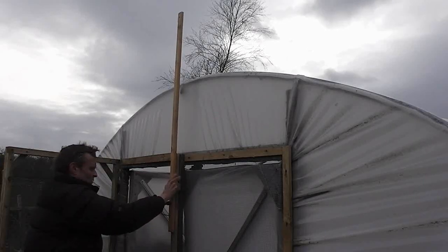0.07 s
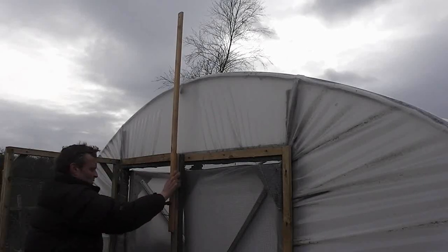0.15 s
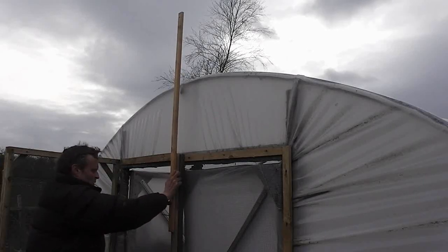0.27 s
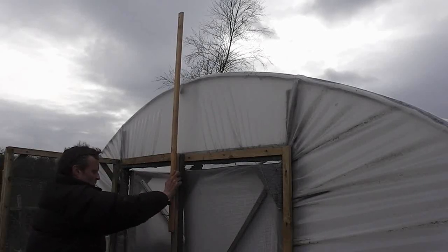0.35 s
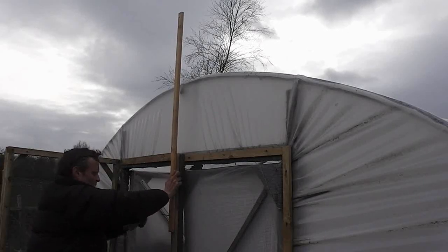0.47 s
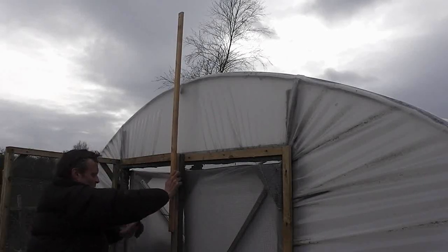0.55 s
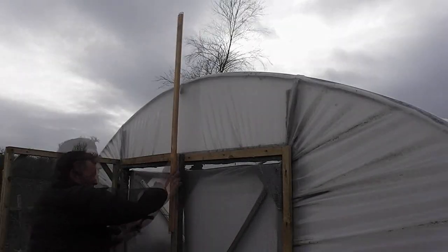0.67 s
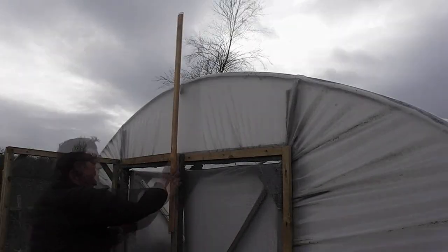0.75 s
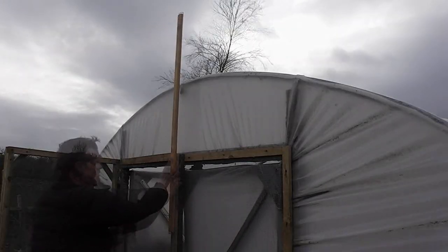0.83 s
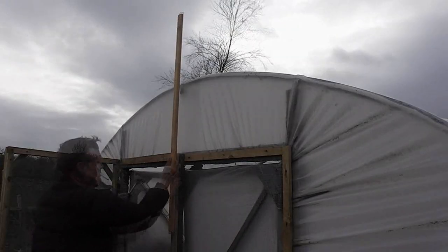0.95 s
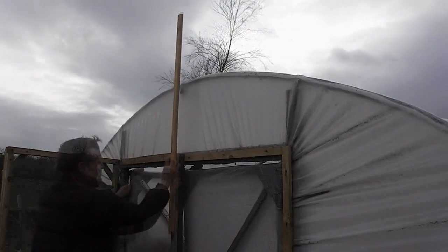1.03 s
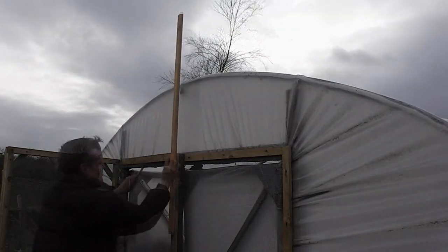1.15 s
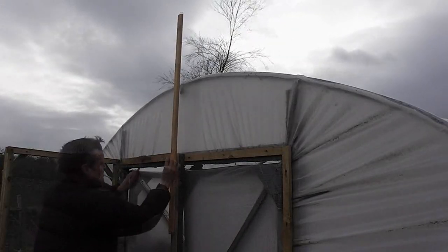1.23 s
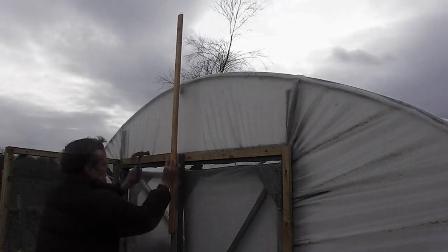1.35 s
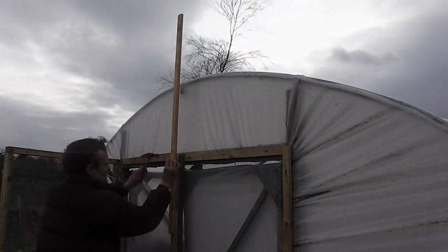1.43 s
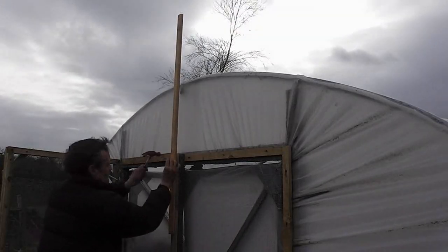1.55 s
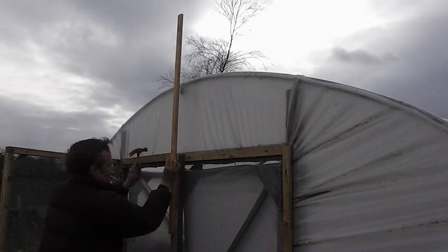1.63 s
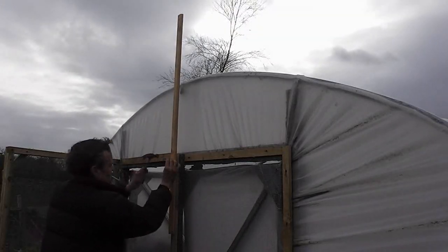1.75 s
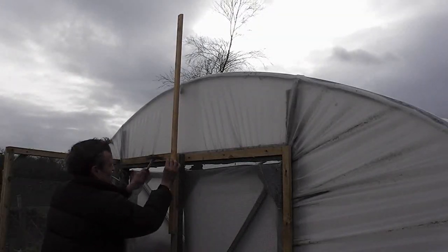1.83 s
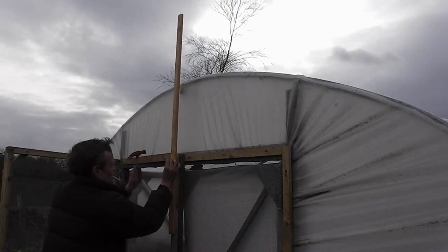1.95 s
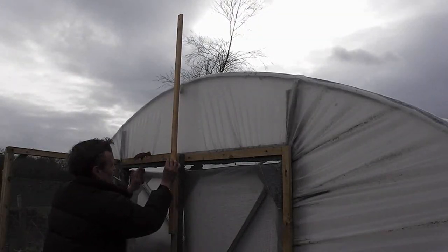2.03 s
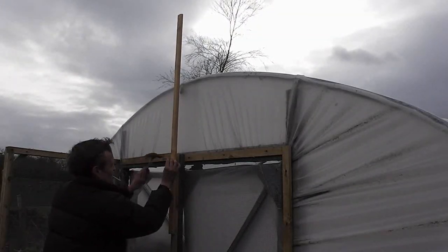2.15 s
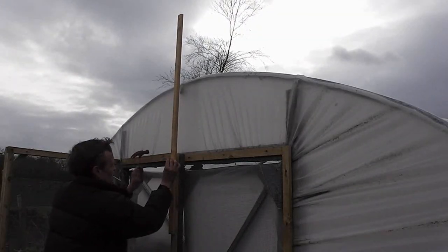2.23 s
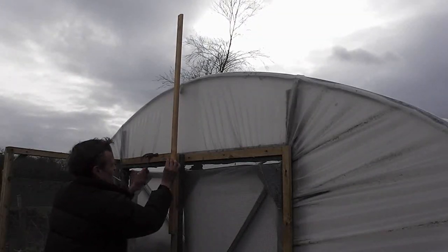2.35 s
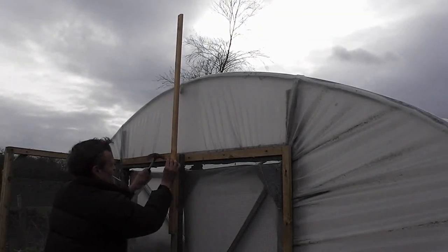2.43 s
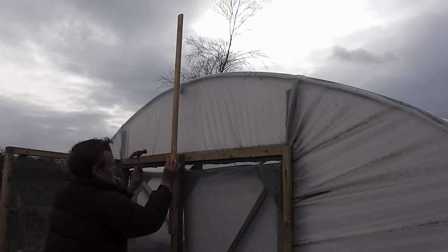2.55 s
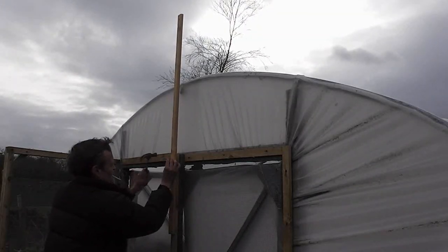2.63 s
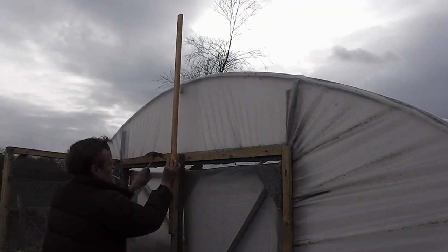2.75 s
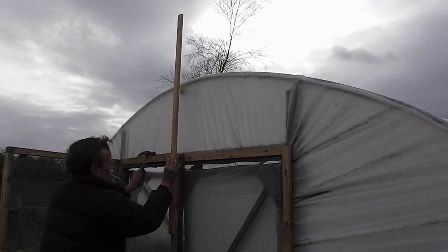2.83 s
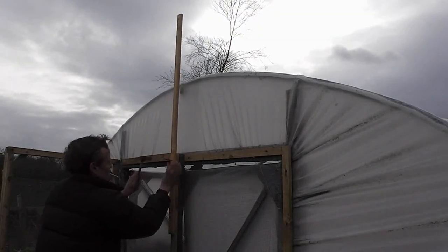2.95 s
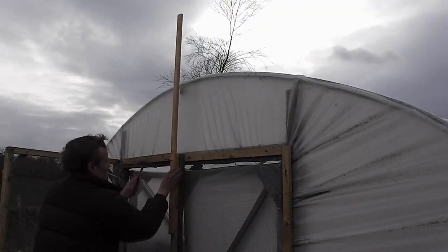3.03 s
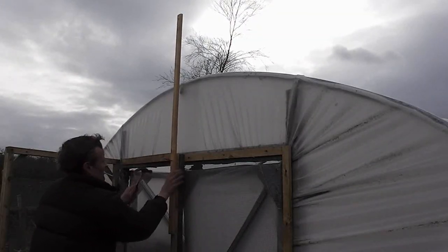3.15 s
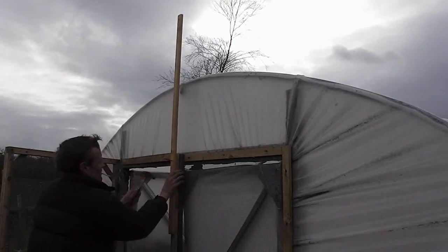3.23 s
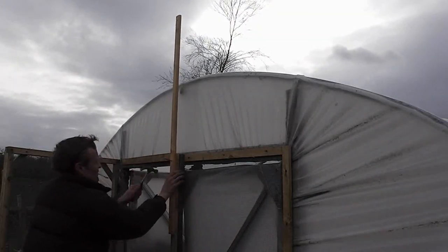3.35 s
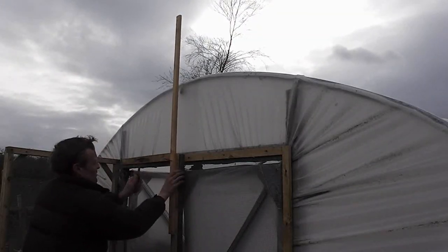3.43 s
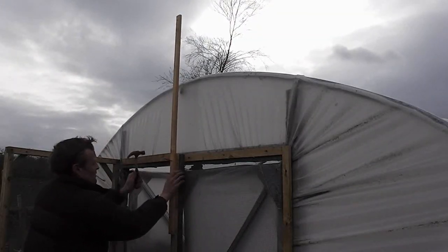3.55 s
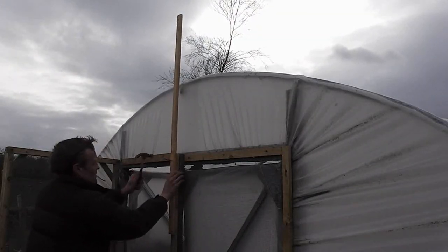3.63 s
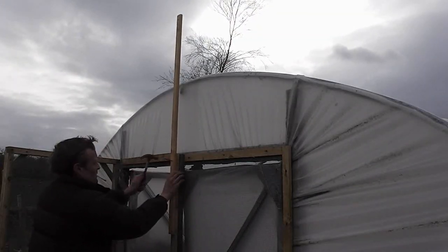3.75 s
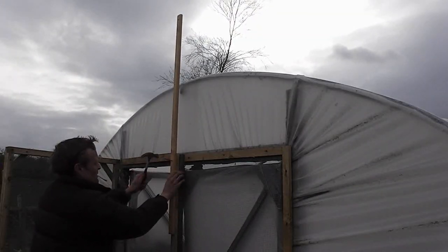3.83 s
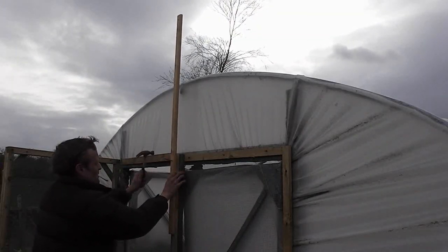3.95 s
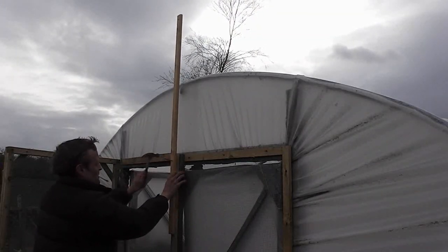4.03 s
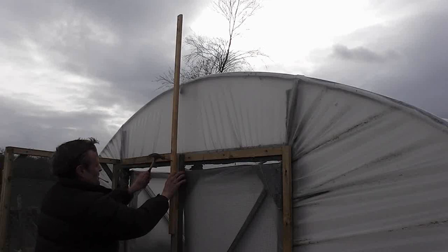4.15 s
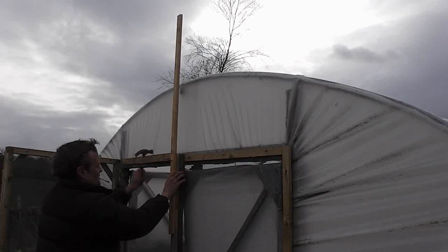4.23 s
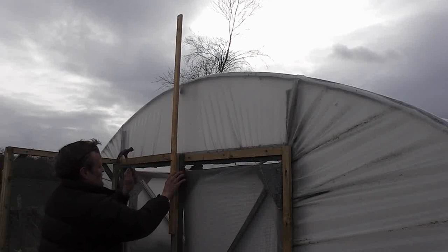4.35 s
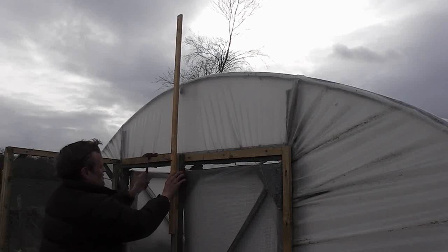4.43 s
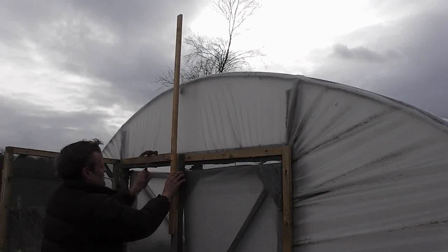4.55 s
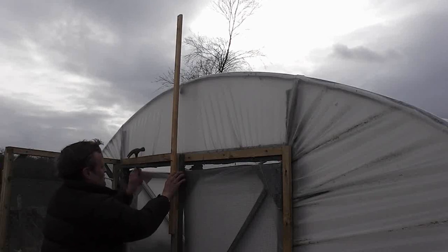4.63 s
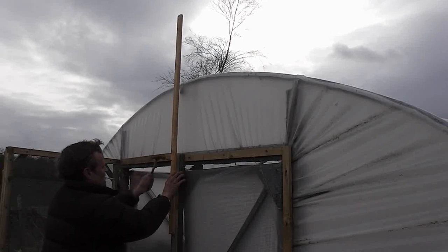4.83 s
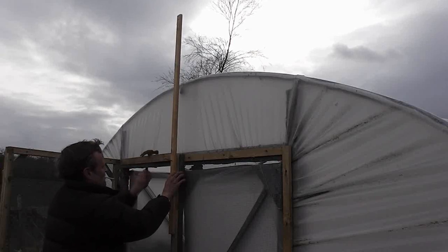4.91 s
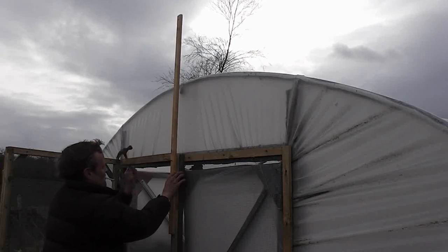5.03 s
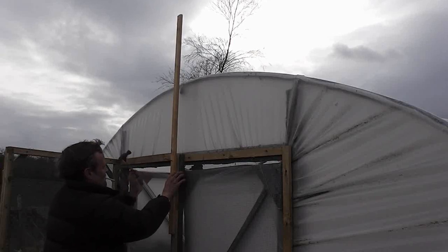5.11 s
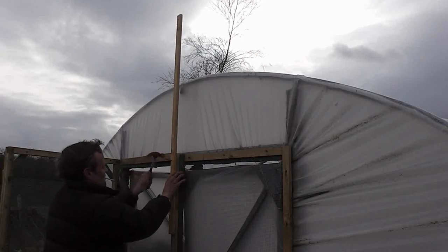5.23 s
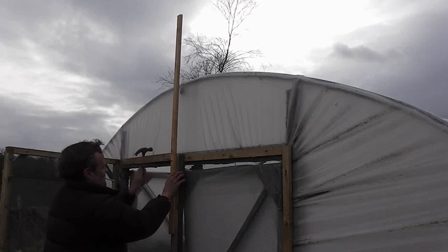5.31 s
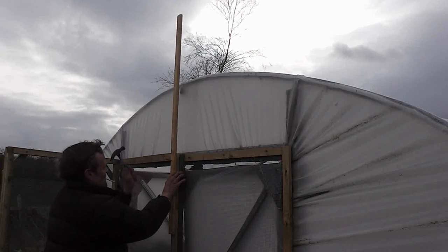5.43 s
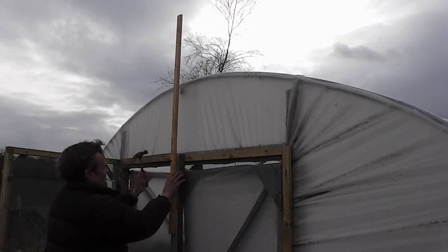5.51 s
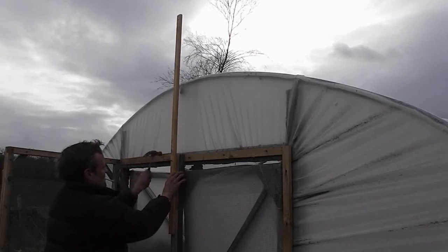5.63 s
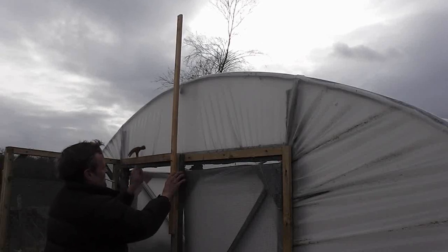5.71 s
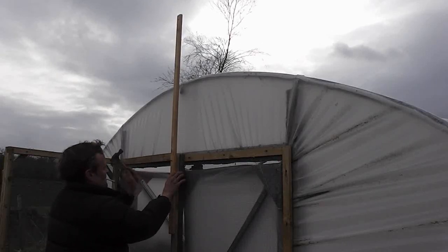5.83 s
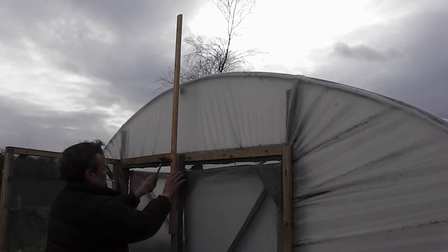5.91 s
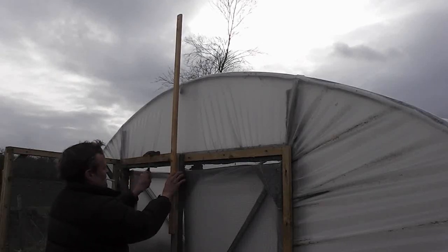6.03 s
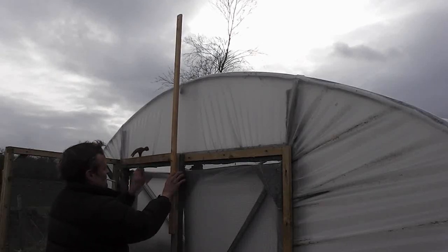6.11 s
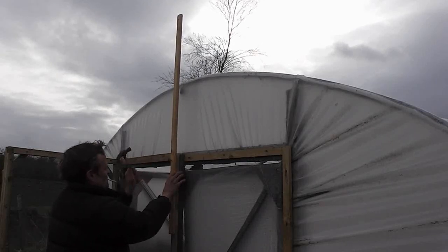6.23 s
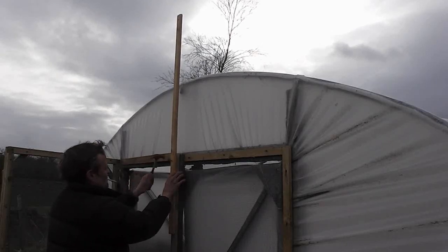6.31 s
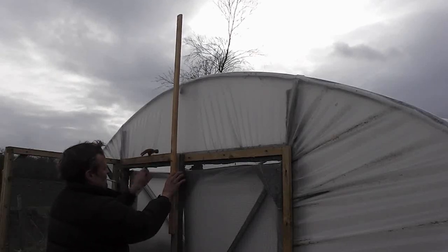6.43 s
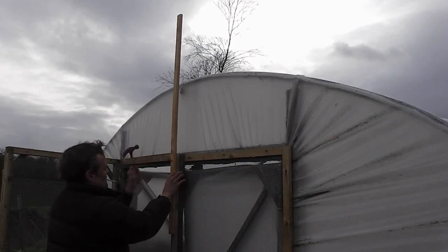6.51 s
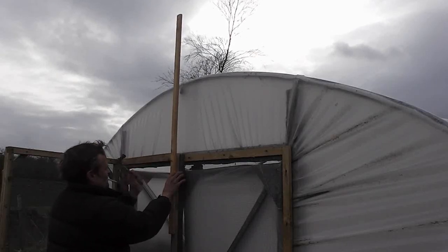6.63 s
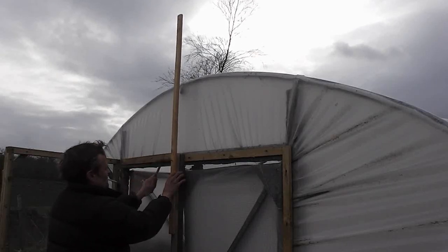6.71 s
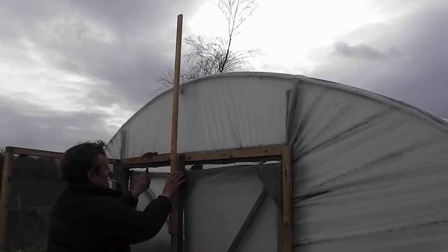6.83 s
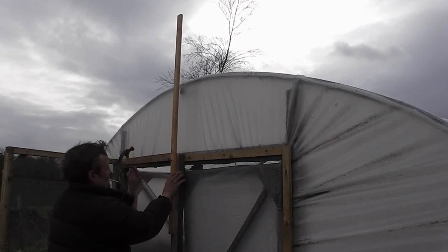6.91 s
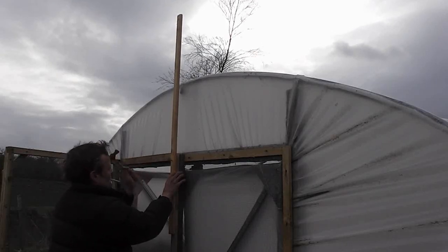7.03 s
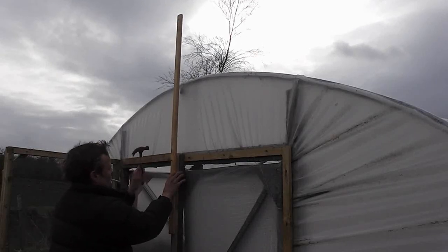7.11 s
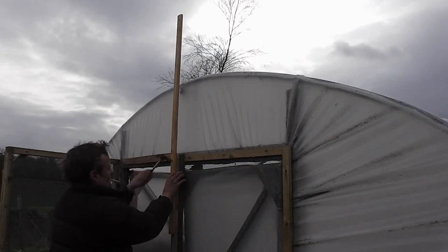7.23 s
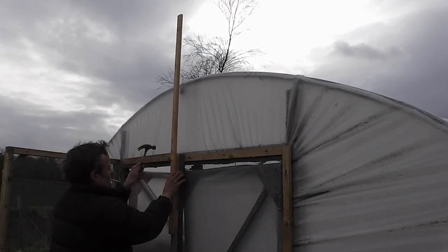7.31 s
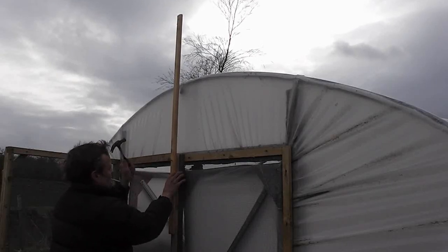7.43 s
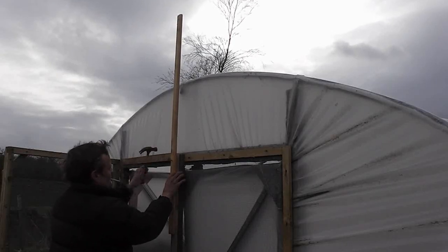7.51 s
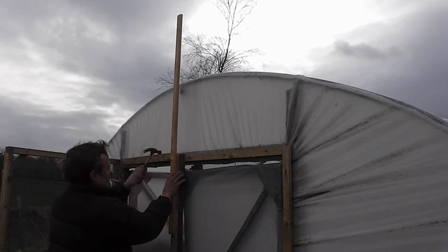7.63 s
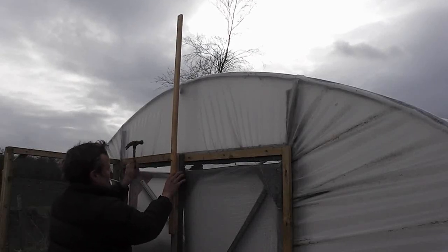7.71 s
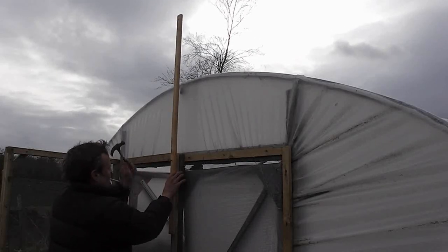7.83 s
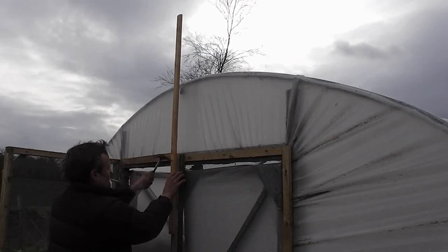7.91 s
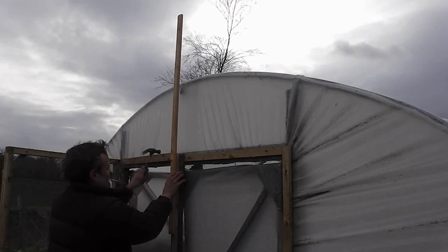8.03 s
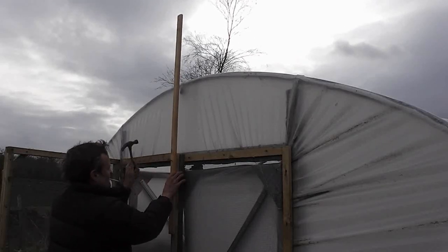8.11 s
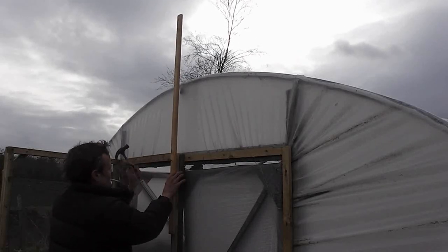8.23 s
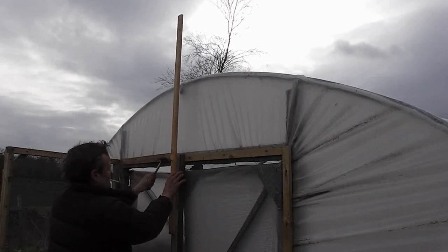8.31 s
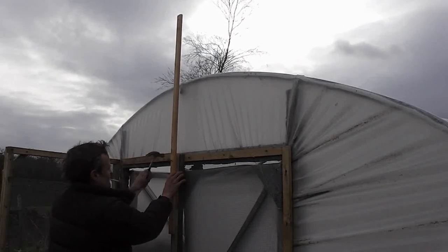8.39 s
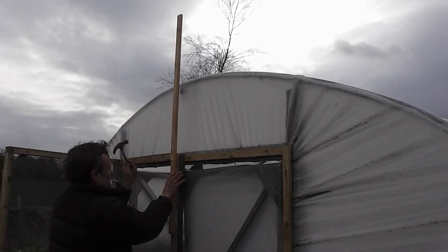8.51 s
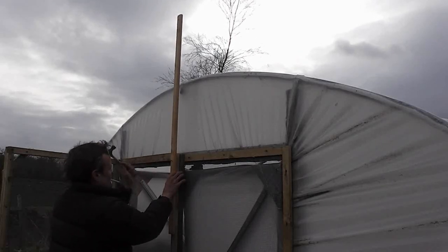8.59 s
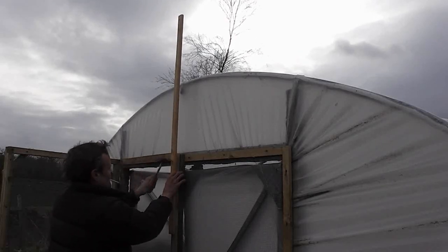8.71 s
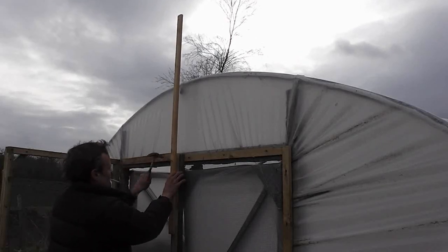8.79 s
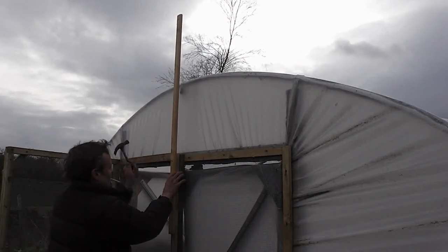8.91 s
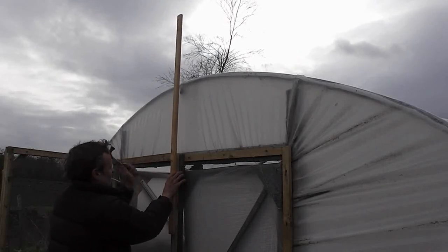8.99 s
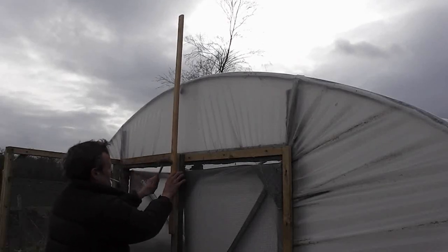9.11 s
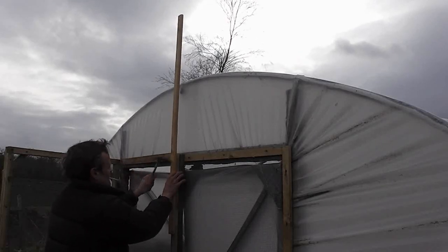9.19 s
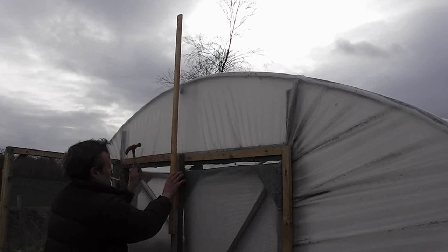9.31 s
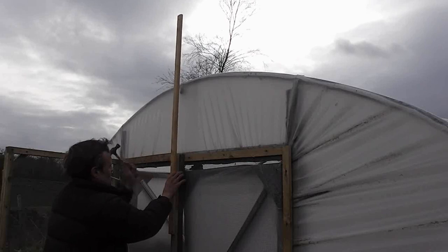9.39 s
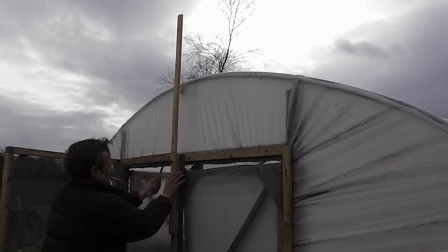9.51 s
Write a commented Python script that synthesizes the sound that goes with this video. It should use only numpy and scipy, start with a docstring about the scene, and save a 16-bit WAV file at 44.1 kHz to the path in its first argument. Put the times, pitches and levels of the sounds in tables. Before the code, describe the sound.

A claw hammer drives a nail into timber outdoors, a few quick strikes, a pause, then steady sharp blows over wind and traffic.

```python
"""Hammering on a greenhouse door frame

A claw hammer drives a nail through a post into the timber door frame of a plastic-covered greenhouse.
Timber and steel ring as decaying modes; tick, frame, sheeting and yard are shaped noise; a far wall sends one echo.
Traffic is a coloured noise drone over a low hum of swelling sines. A jacket rustles and scratches as bright noise;
short low noise bursts are knocks on housing and frame and low echoes of two blows.
Low noise, mostly opposed left to right, is wind at two mic ports."""
import sys
import numpy as np
from scipy import signal
from scipy.io import wavfile
from scipy.ndimage import uniform_filter1d

SR = 44100
rng = np.random.default_rng(int(sys.argv[2]) if len(sys.argv) > 2 else 0)


def bounce(signal):
    """Save signal as a 16-bit WAV file at the path given by the first command-line argument."""
    frames = np.transpose(np.atleast_2d(signal))
    limited = np.clip(frames, -1, 1)
    pcm = np.round(limited * 32767).astype(np.int16)
    wavfile.write(sys.argv[1], SR, pcm)


N = 421155  # samples


def gain_of(db):
    """Decibels to amplitude."""
    return 10 ** (np.asarray(db) / 20)


def evened(x):
    """Scales to an rms of one."""
    return x / np.sqrt(np.mean(x ** 2) + 1e-20)


def read(points, hz, axis=1):
    """One column of a table over a logarithmic frequency axis."""
    table = np.array(points, float)
    return np.interp(np.log(hz + 1), np.log(table[:, 0] + 1), table[:, axis])


def along(curve, axis=1):
    """One column of a time curve at every sample."""
    table = np.array(curve, float)
    return np.interp(np.arange(N) / SR, table[:, 0], table[:, axis])


def add(mix, start_s, sound):
    """Mixes a two-channel sound in at a time."""
    part = mix[:, round(start_s * SR):][:, :sound.shape[1]]
    part += sound[:, :part.shape[1]]


def panned(x, pan_db):
    """Leans a sound left (positive) or right, giving two channels."""
    return x * gain_of([[pan_db / 2], [-pan_db / 2]])


def filtered(x, band_hz, kind):
    """Second-order Butterworth filter along time."""
    return signal.sosfilt(signal.butter(2, band_hz, kind, fs=SR, output="sos"), x, axis=-1)


def hiss(spectrum, likeness, size, patchy_db):
    """Two channels of coloured noise with a given left-right likeness and drifting patches, at an rms of one."""
    hz = np.fft.rfftfreq(size, 1 / SR)
    frames = 4 * N // size + 5
    a, b, c, d, patches = rng.standard_normal((frames, len(hz), 5)).T
    patches = uniform_filter1d(patches, size=8, axis=0)
    patches = evened(uniform_filter1d(patches, size=5, axis=1))
    same = np.clip(likeness(hz), -1, 1)[:, None]
    left, other = a + 1j * b, c + 1j * d
    bands = np.array([left, same * left + np.sqrt(1 - same ** 2) * other])
    bands *= gain_of(read(spectrum, hz)[:, None] + patchy_db * patches)
    return evened(signal.istft(bands, nperseg=size, noverlap=3 * size // 4)[1][:, :N])


def puffs(events, t60_s, octaves, rise_s, apart):
    """Short bursts of band noise that rise quickly and die away."""
    out, t = np.zeros((2, N)), np.arange(SR // 6) / SR
    for start_s, db, hz in events:
        noise = rng.standard_normal((3, len(t)))
        band_hz = [hz / 2 ** octaves, min(hz * 2 ** octaves, .45 * SR)]
        burst = evened(filtered(noise[0] + apart * noise[1:], band_hz, "band"))
        envelope = gain_of(db - 60 * t / t60_s) * (1 - np.exp(-t / rise_s))
        add(out, start_s, envelope * burst)
    return out


# Road level. Each row: time in seconds, rms level in dB.
TRAFFIC_LEVEL = [(0.0, -38), (0.98, -46), (1.55, -42), (2.13, -37), (2.47, -36), (2.85, -42), (3.3, -39.5),
                 (4.2, -40), (4.52, -39), (4.95, -43.5), (5.3, -41.5), (5.6, -45.5), (6.3, -47),
                 (7.21, -43.5), (7.47, -32), (7.8, -45), (8.4, -41.5), (8.8, -44), (9.2, -39.5),
                 (9.55, -44)]
# Road spectrum. Each row: frequency in Hz, relative level in dB per Hz.
TRAFFIC_SPECTRUM = [(24, -40), (40, -12), (140, -5), (275, -8), (445, -12), (550, -14.5), (824, -8.5),
                    (1120, -10.5), (1400, -13), (1900, -22.5), (2720, -36), (4000, -40), (5200, -63),
                    (8800, -120)]
# Road width. Each row: frequency in Hz, left-right likeness from -1 to 1.
TRAFFIC_LIKENESS = [(60, 0.8), (180, 1), (550, 0.9), (1650, 0.47), (4970, -0.17), (15000, -0.47)]


def traffic():
    """A broad drone from a road, swelling as cars pass."""
    drone = hiss(TRAFFIC_SPECTRUM, lambda hz: read(TRAFFIC_LIKENESS, hz), size=1024, patchy_db=1.5)
    return gain_of(along(TRAFFIC_LEVEL)) * drone


# Swells of a low hum. Each row: peak time in seconds, frequency in Hz, rms level at the peak in dB.
HUM_SWELLS = [(1.04, 62.8, -48), (1.3, 63.2, -45.5), (1.51, 64.6, -42.5), (1.769, 62.8, -39),
              (2.2, 64, -45), (3.2, 60.3, -48), (3.5, 62, -47), (3.851, 73.1, -42), (4.05, 62, -47)]
HUM_HALF_WIDTH_S = 0.082  # to 1/e


def engine():
    """A low hum, perhaps a far engine: sines under soft Gaussian swells."""
    out, t = np.zeros((2, N)), np.arange(SR // 2) / SR
    middle_s = t[-1] / 2
    swell = np.exp(-((t - middle_s) / HUM_HALF_WIDTH_S) ** 2)
    for peak_s, hz, db in HUM_SWELLS:
        tone = np.sqrt(2) * np.sin(2 * np.pi * (hz * t + rng.random()))
        add(out, peak_s - middle_s, (gain_of(db) * swell * tone)[None])
    return out


# Steady wind. Each row: time in seconds, level before lumps in dB, left-right difference in dB.
WIND_LEVEL = [(0.0, -20, 0.5), (0.3, -28.5, -4), (0.42, -42.5, -7.5), (1.03, -35, 2), (1.12, -71.5, -6),
              (3.4, -64.5, 1), (3.52, -37, -7), (4.15, -43, -7), (4.7, -47.5, 7), (5.15, -50, 6),
              (5.6, -34, 5), (6.1, -53, 11), (6.65, -62, -9.5), (6.85, -36.5, 8.5), (8.1, -40.5, 0.5),
              (8.55, -61, 7), (9.2, -33.5, -3), (9.55, -36.5, 0.5)]
# Single gusts that thump the ports. Each row: peak time in seconds, peak level in dB, left-right difference in dB.
GUST_PEAKS = [(0.062, -9, -5.5), (0.214, -20, -5), (0.534, -33, -9), (0.713, -33, 5), (0.798, -32, -13),
              (0.933, -27, -5), (1.008, -35, 7.5), (2.55, -37, -9), (3.851, -25, -4.5), (4.036, -34, -9),
              (4.176, -25, -4.5), (4.38, -25.5, -3), (4.475, -26, 5), (4.943, -32, 3), (5.488, -30, -11),
              (5.657, -28.5, -15), (5.933, -25.5, 3), (6.071, -22.5, 6), (6.308, -26, -3.5),
              (6.413, -23, -2), (6.824, -25.5, 1.5), (6.974, -20.5, 0), (7.089, -39, 8), (7.263, -22.5, 4),
              (7.569, -18.5, 1.5), (7.678, -28.5, -4), (7.897, -25, 2), (8.06, -24.5, -4),
              (9.249, -30.5, -6.5), (9.478, -32, -4)]
# Wind spectrum. Each row: frequency in Hz, relative level in dB per Hz.
WIND_SPECTRUM = [(15, -30), (30, -2.5), (60, 5), (120, 2.5), (200, -5.5), (320, -18), (600, -57)]
# Opposition of the ports. Each row: frequency in Hz, left-right likeness from -1 to 1.
WIND_LIKENESS = [(30, -.9), (100, -.8), (250, -.65)]
GUST_DB_PER_S, LUMPS_DB = 453, 5  # gust slope both ways; rms of random lumps


def wind():
    """Lumpy low pressure at the ports, largely opposed between left and right; gusts peak above it."""
    sides, t = np.array([[.5], [-.5]]), np.arange(N) / SR
    lumps = evened(uniform_filter1d(rng.standard_normal(N), size=1800))
    level = gain_of(along(WIND_LEVEL) + sides * along(WIND_LEVEL, axis=2) + LUMPS_DB * lumps)
    for peak_s, db, pan_db in GUST_PEAKS:
        at = np.clip(round(peak_s * SR) + np.arange(-SR // 10, SR // 10), 0, N - 1)
        gust = gain_of(db + sides * pan_db - GUST_DB_PER_S * abs(t[at] - peak_s))
        level[:, at] = np.maximum(level[:, at], gust)
    return level * hiss(WIND_SPECTRUM, lambda hz: read(WIND_LIKENESS, hz), size=2048, patchy_db=2.1)


# Rustle level. Each row: time in seconds, level before flicker in dB.
RUSTLE_LEVEL = [(0.0, -96), (0.18, -55), (0.56, -61), (0.98, -80.5), (2.23, -60.5), (2.95, -62),
                (3.32, -61), (3.64, -60), (3.8, -67), (4.52, -66), (5.5, -77.5), (6.44, -79), (7.42, -58.5),
                (7.85, -69), (8.3, -63.5), (8.85, -67), (9.34, -62.5), (9.55, -64.5)]
# Cloth spectrum. Each row: frequency in Hz, relative level in dB per Hz.
CLOTH_SPECTRUM = [(1500, -23.5), (3000, -0.5), (4000, -1.5), (5800, 4), (8000, 0), (11000, -1.5),
                  (14000, -4.5), (15700, -32.5), (16000, -63.5)]


def rustle():
    """Bright friction noise of a jacket, its level flickering."""
    flicker = evened(uniform_filter1d(rng.standard_normal(N), size=1500))
    cloth = hiss(CLOTH_SPECTRUM, lambda hz: 0.52 + 0 * hz, size=256, patchy_db=0.0)
    return gain_of(along(RUSTLE_LEVEL) + 2.7 * flicker) * cloth


# Short scratches of cloth. Each row: start in seconds, level in dB, centre frequency in Hz.
CLOTH_SCRATCHES = [(0.1979, -60, 7250), (0.2494, -42, 5820), (0.338, -41, 5760), (0.4728, -53, 8810),
                   (0.6265, -48.5, 5900), (0.6994, -53, 5710), (2.7686, -50, 4900), (3.0127, -45.5, 5080),
                   (3.27, -48, 5700), (3.401, -48, 5410), (3.545, -49, 7200), (3.6494, -48, 5760),
                   (3.72, -50, 7400), (3.775, -53, 5200), (3.808, -54, 6370), (7.4894, -43, 5190),
                   (7.5379, -38.5, 10420), (7.916, -53, 5200), (8.4043, -51, 7550)]


def scratches():
    """Cloth friction in short bright bursts."""
    return puffs(CLOTH_SCRATCHES, t60_s=0.062, octaves=0.44, rise_s=0.0042, apart=.6)


# Dull low bumps: knocks on housing and frame, and low echoes about 40 ms after the blows at 1.949 and 2.251 s.
# Each row: start in seconds, level in dB, centre frequency in Hz.
LOW_BUMPS = [(0.115, -23, 195), (0.193, -23.5, 194), (0.337, -26, 290), (0.659, -37, 134), (1.69, -19, 189),
             (1.99, -23.5, 200), (2.29, -26, 196), (5.645, -22, 174), (8.018, -32.5, 229)]


def bumps():
    """Knocks on housing and frame, and low echoes of two blows, as low, fast-rising noise bursts."""
    return puffs(LOW_BUMPS, t60_s=0.15, octaves=0.48, rise_s=0.0015, apart=0.95)


# Frame and sheeting. Each row: frequency in Hz, level in dB, t60 in seconds.
SHAKE_BANDS = [(187, -8, 0.9), (480, 8, 0.16), (1340, 5.5, 0.19), (2520, -4.5, 0.14), (2870, -7.5, 0.13),
               (5600, -6.5, 0.081), (10800, -15, 0.086), (16000, -27.5, 0.074)]
# Yard tail. Each row: frequency in Hz, level in dB, t60 in seconds.
YARD_BANDS = [(200, -30, 1), (613, -15.5, 0.74), (1530, -4, 0.12), (2560, -34.5, 1), (3100, -24.5, 0.36),
              (5500, -28.5, 0.39), (10200, -28, 0.25), (16000, -41, 0.19)]


def scatter(t, frame_db, sheet_db):
    """Lumpy noise rattle of frame and sheeting, then the yard's slower tail, each band dying at its own speed."""
    noise = rng.standard_normal((3, len(t)))
    hz, when_s, bands = signal.stft(noise, SR, nperseg=128, noverlap=96)

    def fading(table):
        return gain_of(read(table, hz)[:, None] - 60 * when_s / read(table, hz, axis=2)[:, None])

    lumps = gain_of(3 * evened(uniform_filter1d(rng.standard_normal(len(when_s)), size=4)))
    near = (bands[0] + 0.32 * bands[1:]) * fading(SHAKE_BANDS) * lumps
    far_rise = 1 - np.exp(-(when_s / 0.0083) ** 2)
    far = (bands[0] + 1.58 * bands[:0:-1]) * fading(YARD_BANDS) * far_rise
    # frame level below 2500 Hz, sheeting level above 3100 Hz
    level = gain_of(read([(2500, frame_db), (3100, sheet_db)], hz))[:, None]
    out = signal.istft((near + far) * level, SR, nperseg=128, noverlap=96)[1][:, :len(t)]
    return out * (1 - np.exp(-(t / 0.0036) ** 2))


def ring(modes, t, favoured_hz, lean_db, free, peak_s, first_db, first_s, loose):
    """Modes swell together to one strong swing at peak_s; loose joints make each waver in phase; peak is one."""
    hz, db, t60_s = np.array(modes).T[:, :, None]
    db = db + lean_db * np.exp(-(np.log(hz / favoured_hz) / 0.12) ** 2)  # the spot struck favours one mode
    weight, detune, slip = rng.standard_normal((len(modes), 3)).T[:, :, None]
    # random phase walk, stepped every 16 samples; loose is in radians per root second
    steps = rng.standard_normal((3, len(modes), len(t) // 16 + 1)) / np.sqrt(SR / 16)
    walk = np.cumsum(np.repeat(steps / 16, 16, axis=2)[..., :len(t)], axis=2)
    drift = loose * (walk[0] + 0.19 * walk[1:])  # the two ports hear slightly different paths
    phase = 2 * np.pi * hz * (1 + 0.0053 * detune) * (t - peak_s) + 0.87 * slip + drift
    waves = gain_of(db + 1.5 * weight - 60 * t / (free * t60_s)) * np.cos(phase)
    swell = np.sin(np.pi / 2 * np.clip(t / peak_s, 0, 1)) ** 2
    first_swing = 1 + gain_of(first_db) * np.exp(-abs(t - peak_s) / first_s)
    out = waves.sum(axis=1) * swell * first_swing
    return -out / abs(out).max()


# Modes in the next three tables. Each row: frequency in Hz, relative level in dB,
# t60 in seconds before the blow's freedom factor.
POST_MODES = [(804, 9, 0.018), (964, -1, 0.034), (1134, -14.5, 0.15), (1397, 3.5, 0.041), (1534, -6, 0.018)]
POST_OVERTONES = [(1704, -3, 0.055), (2020, -8, 0.053), (2013, -6, 0.12), (2233, 1.5, 0.049),
                  (2435, -25.5, .035)]
BEAM_MODES = [(172, -23.5, 0.17), (231, -4.5, 0.27), (275.8, 0.5, 0.25), (330, -7.5, 0.55),
              (408, 0.5, 0.16), (487.3, -3, 0.15), (541, 3, 0.047)]


def timber(t, ring_db, over_db, thud_db, beam_hz, post_hz, over_hz, free):
    """Post, its overtones and the deep beam ring as modes; freer timber rings longer."""
    post = ring(POST_MODES, t, post_hz, 6.6, free, 0.00186, 0, 0.0058, loose=24.0)
    overtones = ring(POST_OVERTONES, t, over_hz, 5.2, free, 0.00185, 0, 0.007, loose=28)
    beam = ring(BEAM_MODES, t, beam_hz, 11.0, free, 0.0017, 0, 0.0028, loose=7.2)
    return gain_of(ring_db) * post + gain_of(over_db) * overtones + gain_of(thud_db) * beam


# Hammer head and nail. Each row: frequency in Hz, relative level in dB, t60 in seconds before STEEL_FREE.
STEEL_MODES = [(3476, -10, 0.035), (3960, -8, 0.016), (4500, -6, 0.0067), (5180, -1, 0.018),
               (5720, -8.5, 0.05), (6320, -2, 0.016), (7150, -6, 0.042), (8040, -8, 0.049),
               (9060, -7, 0.045)]
STEEL_FREE = 2.48  # factor on t60


def steel(t, crack_db, steel_hz):
    """Hammer head and nail crack as short bright modes."""
    return gain_of(crack_db) * ring(STEEL_MODES, t, steel_hz, 8.7, STEEL_FREE, 0.0018, 1.2, 0.0075, loose=41.4)


def tick(t, tick_db):
    """The face bites: a burst of high noise with a fast and a slower decay."""
    late_s = np.maximum(t - .0009, 0)  # a moment after first touch
    decay = gain_of(-60 * late_s / .01) + .3 * gain_of(-60 * late_s / .03)
    bite = (1 - np.exp(-late_s / .0003)) * decay
    grit = filtered(rng.standard_normal((3, len(t))), [6500, 13000], "band")
    return gain_of(tick_db) * bite / grit.std() * (grit[0] + .5 * grit[1:])


TIMBER_PAN_DB, STEEL_PAN_DB, TICK_PAN_DB = 0.84, -0.3, 4
GROUND_S, GROUND_DB = 0.011, -29.5
ECHO_S, ECHO_DB, ECHO_LOWPASS_HZ = .0875, -32.5, 7800


def blow(ring_db, over_db, thud_db, crack_db, tick_db, frame_db, sheet_db, beam_hz, post_hz, over_hz, steel_hz, free):
    """Timber rings and steel cracks; ground and a far wall throw that back while the frame rattles on."""
    t = np.arange(SR // 6) / SR
    wood = timber(t, ring_db, over_db, thud_db, beam_hz, post_hz, over_hz, free)
    bright = panned(steel(t, crack_db, steel_hz), STEEL_PAN_DB) + panned(tick(t, tick_db), TICK_PAN_DB)
    direct = panned(wood, TIMBER_PAN_DB) + bright
    out = panned(scatter(np.arange(SR // 4) / SR, frame_db, sheet_db), TIMBER_PAN_DB)
    add(out, 0, direct)
    add(out, GROUND_S, gain_of(GROUND_DB) * bright)
    add(out, ECHO_S, gain_of(ECHO_DB) * filtered(direct, ECHO_LOWPASS_HZ, "low"))
    return out


# Blows and rebounds. Each row: time in seconds, levels in dB of post ring, post overtones, deep thud, steel crack,
# fine tick, frame shake and sheeting shake, favoured frequencies in Hz of beam, post, post overtone and steel,
# freedom of the timber as a factor on its t60.
HAMMER_BLOWS = [(1.115, -17.5, -12.5, -22.5, -9.5, -19.5, -21, -16.5, 262, 770, 1700, 3680, 0.87),
                (1.447, -29, -26.5, -32, -19, -29.5, -34, -25, 283, 1300, 1640, 4170, 1.8),
                (1.654, -13, -25, -9.5, -14.5, -19.5, -25, -22, 570, 872, 2010, 6960, 2.5),
                (1.949, -6.5, -17, -11, -11, -12.5, -12.5, -11.5, 585, 945, 1840, 7800, 1.3),
                (2.251, -3, -10, -9, -13, -13, -12, -12, 590, 1440, 1610, 3900, 1.35),
                (2.545, -2, -9.5, -10.5, -7, -12.5, -14, -11, 550, 1490, 1640, 6560, 1.5),
                (2.827, -5, -6.5, -11.5, -8.5, -12, -16, -10, 570, 1470, 1730, 6070, 1.7),
                (2.845, -11, -34, -19, -18, -38, -20, -22, 275, 974, 2160, 5000, 1),
                (4.263, -3.5, -14, -18, -11, -15, -15.5, -14.5, 434, 1400, 2300, 3350, 1.05),
                (4.623, -5, -6.5, -7.5, -8.5, -19.5, -17, -11.5, 543, 1430, 2150, 3680, 0.78),
                (4.987, -5, -9.5, -12, -8, -15.5, -16, -11, 510, 1380, 2200, 3780, 1.3),
                (5.339, -7, -12, -12.5, -6.5, -18.5, -18, -10, 560, 1330, 2410, 4440, 0.91),
                (5.713, -7, -13, -30.5, -8.5, -15, -16, -9.5, 483, 805, 2300, 6940, 1.9),
                (6.082, -10, -14.5, -14, -8, -14.5, -18.5, -9.5, 570, 790, 2200, 7600, 2),
                (6.093, -5.5, -8, -33, -7.5, -21, -20.5, -21.5, 490, 1360, 2190, 5170, .86),
                (6.494, -6.5, -14.5, -19.5, -11.5, -13, -20, -13, 407, 886, 2090, 7750, 1.1),
                (6.511, -24, -12, -25, -29, -30, -28, -24, 275, 1440, 2240, 5170, 1),
                (6.864, -3, -14, -20, -6, -15.5, -17.5, -16, 583, 910, 2240, 5500, .7),
                (6.884, -30, -44, -49, -26, -26, -45, -21, 218, 950, 1860, 5500, 1.3),
                (7.386, -8.5, -12, -4.5, -9.5, -17, -11.5, -16, 410, 1110, 1660, 6200, 1.26),
                (7.416, -24, -46, -7, -7.5, -13, -36, -12, 476, 790, 1650, 5300, 1.26),
                (7.427, -23, -41, -24, -12, -24, -28, -27, 420, 790, 1650, 4100, 4.1),
                (7.706, -3.5, -12.5, -14.5, -12, -13.5, -18.5, -13.5, 660, 970, 2280, 7450, 0.68),
                (8.078, -5.5, -9, -13.5, -10, -14, -15, -9, 524, 1130, 2200, 6700, 1.9),
                (8.461, -2.5, -13.5, -11, -8.5, -11, -14.5, -7.5, 505, 900, 2400, 7830, 0.71),
                (8.851, -3, -18, -11, -9, -10, -16.5, -9, 475, 920, 2240, 5500, 0.72),
                (9.254, -5.5, -11, -10.5, -9.5, -8.5, -15.5, -12, 516, 920, 1940, 5500, 0.94)]
CONTACT_S = .0004  # first touch comes this long before a blow's time


def hammering():
    """Places each blow from its first touch."""
    out = np.zeros((2, N))
    for blow_s, *strength in HAMMER_BLOWS:
        add(out, blow_s - CONTACT_S, blow(*strength))
    return out


def scene():
    """Hammer blows in the yard over traffic, hum, wind, rustle, scratches and low bumps."""
    return traffic() + engine() + wind() + rustle() + scratches() + bumps() + hammering()


# Microphone hiss. Each row: frequency in Hz, relative level in dB per Hz.
MIC_SPECTRUM = [(1500, -37), (2500, -3.5), (3100, -15), (3900, 4.5), (5000, 0.5), (15000, -7),
                (15600, -19.5), (15900, -61.5)]
MIC_NOISE_DB = -65
THRESHOLD_DB, DETECTOR_FALL_DB_PER_S, GAIN_LAG_S = -23, 37.5, 0.036
CEILING, EDGE_HZ = .97, 16500


def record(dry):
    """Microphones add hiss, gain control dips after loud sounds, peaks round off; then the band limit."""
    mic_noise = hiss(MIC_SPECTRUM, lambda hz: 0.2 + 0 * hz, size=512, patchy_db=3.8)
    wet = dry + gain_of(MIC_NOISE_DB) * mic_noise
    power = uniform_filter1d((wet ** 2).mean(axis=0), size=400)
    power_db = 10 * np.log10(abs(power) + 1e-12)
    fall_db = np.arange(N) * DETECTOR_FALL_DB_PER_S / SR
    held_db = np.maximum.accumulate(power_db + fall_db) - fall_db  # instant rise, steady fall
    over_db = np.maximum(held_db - THRESHOLD_DB, 0)
    lag = np.exp(-1 / (GAIN_LAG_S * SR))
    cut_db = 0.45 * signal.lfilter([1 - lag], [1, -lag], over_db)
    wet = wet / gain_of(cut_db)
    rounded = wet / (1 + abs(wet / CEILING) ** 4) ** (1 / 4)
    lowpass = signal.firwin(511, EDGE_HZ, window=("kaiser", 10), fs=SR)
    return signal.oaconvolve(rounded, lowpass[None], "same", axes=1)


dry = scene()
out = record(dry)
bounce(out)
```